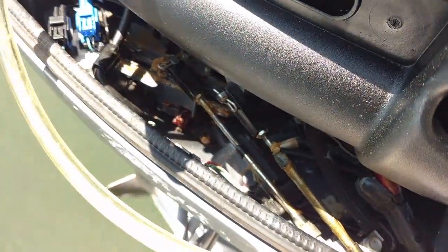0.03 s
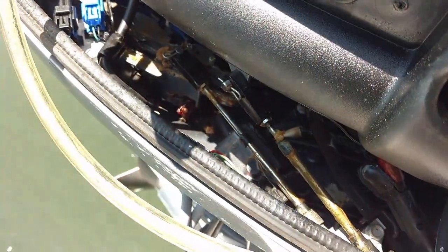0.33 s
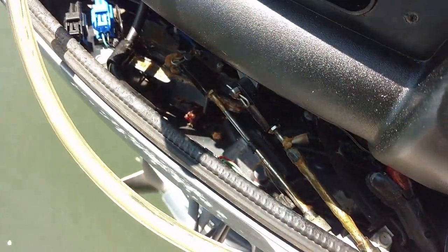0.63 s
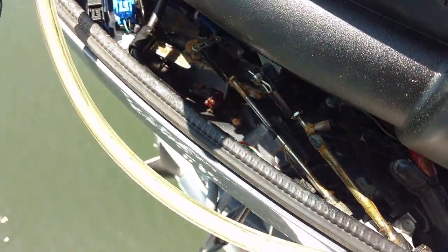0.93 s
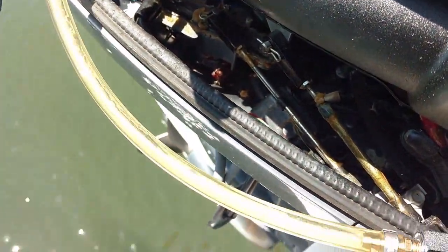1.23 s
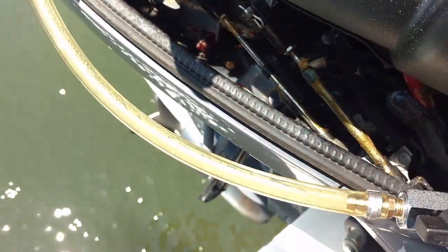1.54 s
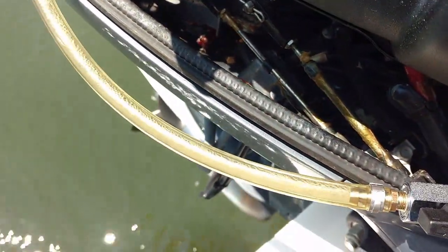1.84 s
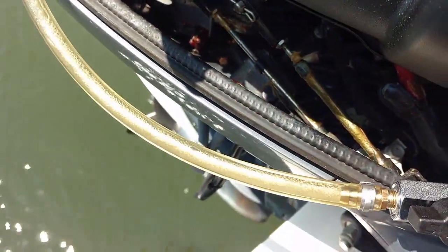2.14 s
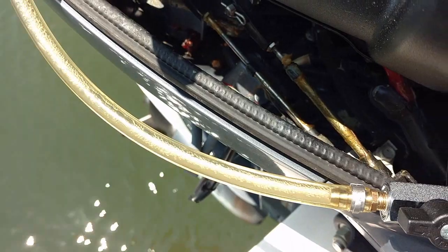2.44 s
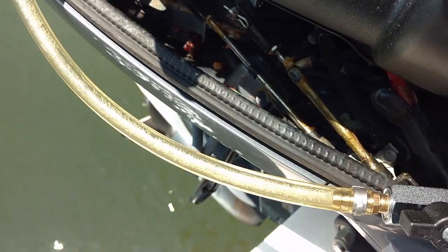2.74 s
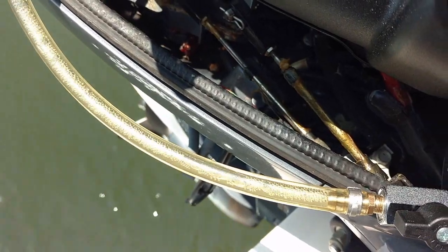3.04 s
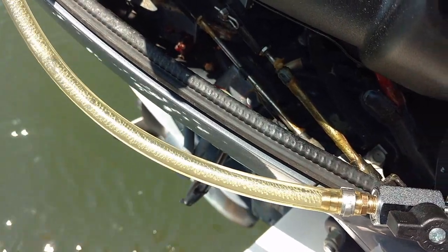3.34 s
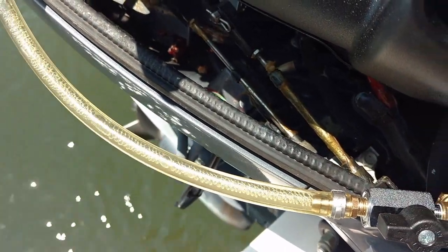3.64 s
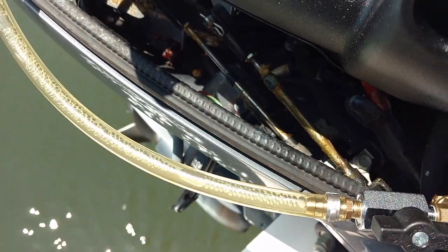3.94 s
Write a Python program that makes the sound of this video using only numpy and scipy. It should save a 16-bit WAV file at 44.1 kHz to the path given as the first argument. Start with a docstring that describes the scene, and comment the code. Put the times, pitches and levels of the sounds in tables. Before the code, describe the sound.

An electric fuel pump whines steadily on a nearby outboard engine for all four seconds, swelling slightly at times. A low motor drone beneath it drops away at about 2.5 seconds, just after a sharp click; fainter clicks are scattered from 1 second on. Water laps and plops at the hull throughout, with drips around 0.4 seconds. Wind rumbles on the microphone, bumping hardest near 1.1 seconds.

```python
"""A clean, steady whine comes first: an electric fuel pump on the open outboard engine of a moored boat,
heard from beside it on a hand-held phone with two microphone ports. Under it a low motor drone runs and
drops away. Water laps, plops and drips at the hull, ringing as bubbles, and something clicks sharply on
the engine. Faint harbour air lies behind, and wind bumps the microphone."""
import sys
import numpy as np
from scipy import signal
from scipy.fft import rfft, irfft
from scipy.io import wavfile
from scipy.ndimage import uniform_filter1d

SR = 44100
rng = np.random.default_rng(int(sys.argv[2]) if len(sys.argv) > 2 else 0)


def dump(signal):
    """Clip the signal to [-1, 1] and save it as 16-bit WAV at the path in sys.argv[1]."""
    limited = np.clip(np.atleast_2d(signal).T, -1, 1)
    pcm = np.round(limited * 32767).astype(np.int16)
    wavfile.write(sys.argv[1], SR, pcm)


N = 176400
T = np.arange(N) / SR
FREQS = np.arange(N // 2 + 1) * SR / N
PORT_LAG_S, PIVOT_HZ = .000385, 1215  # above the pivot the left port leads in phase
SIDE = np.array([[1], [-1]]) / 2  # splits a left-right difference between the ports


def undb(db):
    """Decibels to gain."""
    return 10 ** (np.asarray(db) / 20)


def unit(x):
    """Scale to rms 1."""
    return x / np.sqrt(np.mean(x ** 2))


def curve(rows, column=1):
    """One column of a table, joined by straight lines in time."""
    rows = np.array(rows)
    return np.interp(T, rows[:, 0], rows[:, column])


def spectrum(points):
    """Points joined by straight lines on a log-frequency axis."""
    points = np.array(points)
    return np.interp(np.log(FREQS + 1), np.log(points[:, 0]), points[:, 1])


def colour(x, points):
    """Filter a sound by a spectrum and scale it to rms 1."""
    return unit(irfft(rfft(x) * undb(spectrum(points)), N))


def noise():
    """White noise."""
    return rng.standard_normal(N)


def walk(rate_hz):
    """Smooth random wander up to about a given rate, at rms 1."""
    return unit(irfft(rfft(noise()) * np.exp(-(FREQS / rate_hz) ** 2), N))


def add(out, start, sound):
    """Mix a short sound in at a time in seconds."""
    i = int(np.clip(start * SR, 0, N - 1))
    out[i:i + len(sound)] += sound[:N - i]


# The whine at the phone (multiple of the pump pitch, level [dB], left-right [dB], share of swell [0-1])
WHINE_PARTIALS = [(1, -38, -4.5, 1), (2, -44, -2, 0.44), (3, -45.5, 2.5, 0.34), (4, -63.5, 9.5, 0.7),
                  (5, -54, 1, 0), (6, -67, -13, 0), (7, -56, -1, 0), (8, -62.5, -5.5, 0.35),
                  (9, -68.5, -1, 0.4), (12, -68, 2, 0.9), (13, -70.5, -2, 1)]
# Swell of the whine (time [s], gain [dB])
WHINE_SWELL = [(0, -4), (.15, 4.5), (.29, 4), (.38, -2.5), (1.25, -3), (1.52, 1), (1.68, 0), (1.8, 0),
               (1.91, 2.5), (2.06, 4.5), (2.16, -3), (2.27, 3.5), (2.41, 4.5), (2.52, -3), (3.17, -2.5),
               (3.31, 4.5), (3.4, -2.5), (3.49, 2.5), (3.67, -3.5), (3.77, 5.5), (3.93, 1.5), (4, -3)]
# Rise and fall of the seventh partial (time [s], gain [dB])
SEVENTH_GAIN = [(0, -11), (.5, 0.5), (1.5, -5.5), (2.3, -1.5), (2.55, 3), (3.18, 3), (3.27, -15),
                (3.66, 2.5), (3.7, -5)]
# Extra rise and fall of the two highest partials (time [s], gain [dB])
TOP_PAIR_GAIN = [(1.4, -2), (1.95, 1), (2.2, -6), (3.2, -4), (3.52, 0.5), (4, 3.5)]


def fuel_pump(pump_hz=500.08, sway_rad=0.19, wobble_depth=.075, wobble_hz=18):
    """The pump whines on the open engine; each partial wobbles on its own, and most swell together."""
    phase = 2 * np.pi * pump_hz * T + sway_rad * walk(3.5)
    out = np.zeros((2, N))
    for k, db, pan_db, share in WHINE_PARTIALS:
        extra_db = (k == 7) * curve(SEVENTH_GAIN) + (k > 10) * curve(TOP_PAIR_GAIN)
        gain = undb(share * curve(WHINE_SWELL) + extra_db)
        wobble = wobble_depth * np.sqrt(k / 2) * (walk(wobble_hz) + 1j * walk(wobble_hz))
        tone = (gain + wobble) * np.exp(1j * k * phase)
        lead_rad = 2 * np.pi * PORT_LAG_S * max(k * pump_hz - PIVOT_HZ, 0)
        at_ports = undb(db + SIDE * pan_db) * np.exp(1j * SIDE * lead_rad)
        out += np.sqrt(2) * np.imag(tone * at_ports)
    return out


# The motor note, dead centre (time [s], pitch [Hz], level [dB])
MOTOR_NOTE = [(0, 141.9, -46), (.6, 144.4, -46), (2, 148.8, -45.5), (2.42, 149.6, -47), (2.52, 148, -60),
              (4, 142.6, -57.5)]
# The thrum below it (time [s], level [dB])
THRUM_LEVEL = [(0, -53.5), (1.5, -46), (2.1, -50), (3, -51), (3.6, -56)]


def motor_drone(octave_db=-9, thrum_hz=123.5):
    """A low motor note with its octave runs and drops away, over a steadier thrum."""
    pitch_hz = curve(MOTOR_NOTE) * (1 + 0.0038 * walk(6.3))
    phase = 2 * np.pi * np.cumsum(pitch_hz) / SR
    motor_gain = undb(curve(MOTOR_NOTE, column=2) + 1.34 * walk(22))
    motor = motor_gain * (np.sin(phase) + undb(octave_db) * np.sin(2 * phase))
    thrum_gain = undb(curve(THRUM_LEVEL) + 2 * walk(2.04))
    thrum = thrum_gain * np.sin(2 * np.pi * thrum_hz * T + 1.17 * walk(1.8))
    return np.sqrt(2) * (motor + thrum)


def bubble(hz, decay_s, glide=0.025):
    """A bubble rings briefly, its pitch rising by the fraction `glide` in each decay time."""
    age = T[:int(5 * decay_s * SR) + 2]
    phase = 2 * np.pi * hz * age * (1 + glide * age / decay_s / 2)
    attack = 1 - np.exp(-2 * age * hz)
    return np.sin(phase) * np.exp(-age / decay_s) * attack


def bubbles(low_hz, high_hz, cycles, spread_db, count):
    """A random stream of bubbles; the spread makes a few louder than the rest."""
    out = np.zeros(N)
    for when, pitch, rarity in rng.random((count, 3)):
        hz = low_hz * (high_hz / low_hz) ** pitch
        gain = undb(-spread_db * np.log(max(rarity, np.exp(-4))))
        add(out, when * N / SR, gain * bubble(hz, cycles / hz))
    return unit(out)


# Lapping down at the waterline (time [s], boom gain [dB], gurgle gain [dB], spray gain [dB])
LAP_GAINS = [(0, 8, -1.5, -2.5), (.25, 11, 2, 3.5), (.65, 4, -1, 4), (.95, 0.5, -0.5, 1.5),
             (1.15, 9, -2.5, 4), (1.65, 8, -0.5, 4), (1.8, 1, -1.5, 3.5), (2, -6.5, -3.5, 1.5),
             (2.3, -7, -3, -1.5), (2.55, 7.5, 0, 2), (2.7, -7, -5.5, 0), (3.28, -1.5, -6, -1.5),
             (3.35, 0, -4, 4.5), (3.6, -5, -5, -3), (3.8, 1, -5.5, -0.5), (4, -0.5, -7.5, -2.5)]
# Colour of the boom under the hull (frequency [Hz], gain [dB])
BOOM_COLOUR = [(250, -4), (330, -15.5), (395, -15.5), (440, 1.5), (530, 3.5), (620, -9.5), (730, -24.5),
               (850, -39), (2000, -58)]
# Colour of the gurgle alongside (frequency [Hz], gain [dB])
GURGLE_COLOUR = [(600, 5.5), (800, -14), (1000, 6.5), (1150, 3.5), (1280, 4.5), (1390, 10), (1600, -6),
                 (1900, 2.5), (2400, -2), (4000, -39)]
# Colour of the spray and its hiss (frequency [Hz], gain [dB])
SPRAY_COLOUR = [(1600, -19), (2450, 2), (3100, 11), (4200, -3.5), (5100, -0.5), (6200, 0.5), (7500, -5),
                (9500, -6), (12000, -12.5), (15000, -22.5)]


def lapping(boom_db=-47, gurgle_db=-43.5, spray_db=-54):
    """Big bubbles boom under the hull, smaller ones gurgle, and spray crackles more as the water stirs."""
    stir = undb(curve(LAP_GAINS, column=3))
    boom = colour(bubbles(296, 871.5, cycles=8, spread_db=0, count=700) + 0.22 * noise(), BOOM_COLOUR)
    gurgle = colour(bubbles(697, 2670, cycles=7.5, spread_db=2.2, count=2500) + noise(), GURGLE_COLOUR)
    crackle = stir * bubbles(3870, 14070, cycles=22, spread_db=3.5, count=3600)
    spray = colour(crackle + 2.7 * noise(), SPRAY_COLOUR)
    return (boom * undb(boom_db + curve(LAP_GAINS) + 2 * walk(19))
            + gurgle * undb(gurgle_db + curve(LAP_GAINS, column=2) + 2 * walk(15))
            + spray * stir * undb(spray_db + walk(10)))


# Colour of the background around the mooring (frequency [Hz], gain [dB])
AIR_COLOUR = [(25, -37), (70, -9), (130, -1.5), (180, -3.5), (215, 0), (260, -12.5), (400, -17.5),
              (720, -7), (1200, -22), (2500, -20.5), (12000, -45)]


def harbour_air(level_db=-45):
    """A faint, steady, low rush lies behind the boat."""
    return undb(level_db) * colour(noise(), AIR_COLOUR)


# Steady breeze right on the microphone (time [s], level [dB])
BREEZE_LEVEL = [(0, -38), (.45, -36.5), (.85, -35), (2.1, -34.5), (3.4, -36.5), (3.65, -41)]
# Gusts bumping the microphone (time [s], level [dB])
GUSTS = [(.06, -36), (.71, -27), (.79, -32), (.875, -29), (1.08, -24), (1.87, -32), (2.28, -27),
         (2.49, -46), (3.19, -31)]
# Colour of the wind rumble (frequency [Hz], gain [dB])
RUMBLE_COLOUR = [(20, -32), (35, -23), (55, 10), (100, 17.5), (150, 12), (210, 3.5), (400, -11),
                 (3000, -83)]


def wind(bump_s=0.024):
    """A breeze rumbles on the phone and gusts bump it; the right channel carries it inverted and just later."""
    breeze = undb(curve(BREEZE_LEVEL) + 2 * walk(18))
    bumps = sum(undb(db) * np.exp(-((T - when) / bump_s) ** 2) for when, db in GUSTS)
    rumble = colour(noise(), RUMBLE_COLOUR) * (breeze + bumps)
    return np.array([rumble, -np.roll(rumble, int(PORT_LAG_S * SR))])


# Plops against the hull (time [s], length [s], pitch [Hz], level [dB])
HULL_PLOPS = [(.061, 0.0072, 530, -31), (.652, 0.019, 460, -31), (.735, 0.013, 532, -31.5),
              (1.372, 0.019, 980, -36), (1.44, 0.1, 480, -39.5), (1.508, .012, 487, -33),
              (1.636, 0.041, 462, -34), (1.83, 0.048, 1290, -41.5), (2.139, 0.03, 617, -40.5),
              (2.215, .025, 466, -31), (2.424, 0.025, 937, -34), (2.427, 0.035, 1270, -41),
              (2.58, .02, 425, -45), (2.751, 0.02, 1020, -31.5), (2.933, 0.032, 1058, -32.5),
              (3.721, .08, 710, -43)]


def plops(count=7, decay_s=0.0045, pitch_spread=0.12):
    """Each plop at the hull is a quick cluster of bubbles around one pitch."""
    out = np.zeros(N)
    for start, length, hz, db in HULL_PLOPS:
        cluster = np.zeros(N)
        for k, (late, detune) in enumerate(rng.random((count, 2))):
            ring = bubble(hz * (1 + pitch_spread * (detune - .5)), decay_s, glide=0.021)
            add(cluster, start + length * (k + late) / count, ring)
        out += cluster * undb(db) * np.sqrt(length * SR / np.sum(cluster ** 2))
    return out


# Drops landing beside the hull (time [s], pitch [Hz], first bubble's peak [dB])
DROPS = [(0.308, 6000, -47), (.335, 3040, -32.5), (.404, 5940, -34.5), (.434, 5990, -31.5),
         (1.083, 3050, -37.5), (1.376, 3150, -39), (1.608, 5950, -39.5), (1.685, 6070, -39),
         (1.79, 6400, -43.5), (2.223, 5790, -39)]


def drips(cycles=48, glide=.004, splash_db=9.5, splash_ref_hz=10700):
    """A drop splashes and leaves a bubble, then a smaller one; low ones ring longer and splash less."""
    rings, splash_force = np.zeros((2, N))
    for (start, hz, db), (late, detune) in zip(DROPS, rng.random((len(DROPS), 2))):
        decay_s = cycles / hz
        first = undb(db) * bubble(hz, decay_s, glide)
        second = .5 * undb(db) * bubble(hz * (1 + detune / 10), decay_s / 2)
        add(rings, start, first)
        add(rings, start + (late + .5) * decay_s, second)
        add(splash_force, start, np.abs(first) * (hz / splash_ref_hz) ** 2)
    hiss = colour(noise(), [(2000, -24), (5000, 5), (7000, 10.5), (10000, -1), (15000, -19)])
    return rings + undb(splash_db) * uniform_filter1d(splash_force, 128) * hiss


# Clicks on the engine (time [s], level [dB], length before the decay [s], brightness [0-1])
ENGINE_CLICKS = [(1.059, -42.5, 0.0022, 0.17), (1.604, -41, 0.0031, 0.4), (1.716, -38, 0.0071, 0.28),
                 (2.132, -48.5, .003, 0.8), (2.4235, -49, .002, 0), (2.4279, -29, 0.0026, 0),
                 (2.744, -44.5, 0.019, 0), (3.315, -39.5, 0.0015, 0.23), (3.773, -46, 0.0038, 0.4)]
# Colour of the scrape in each click (frequency [Hz], gain [dB])
SCRAPE_COLOUR = [(800, -14), (1400, 8), (2300, 9.5), (3000, 14), (3800, 7), (5000, 2.5), (7000, -0.5),
                 (9300, 2.5), (12000, -5.5), (15000, -24)]


def clicks(decay_s=0.0075, tick_hz=10700, ring_hz=3800, ring_s=0.0075, ring_db=-4.5):
    """Hard parts scrape for a few milliseconds and a metal part rings off; light touches tick brighter."""
    scrape_force, tick_force, rings = np.zeros((3, N))
    metal = np.sin(2 * np.pi * ring_hz * T) * np.exp(-T / ring_s)
    for start, db, length, bright in ENGINE_CLICKS:
        force = undb(db) * np.exp(-np.maximum(T[:SR // 10] - length, 0) / decay_s)
        add(scrape_force, start, (1 - bright) * force)
        add(tick_force, start, bright * force)
        add(rings, start, (1 - bright) * undb(db + ring_db) * metal)
    grit = colour(noise() * undb(walk(530)), SCRAPE_COLOUR)
    hiss = colour(noise(), [(2000, -20), (tick_hz, 0), (18000, -8)])
    return rings + scrape_force * grit + tick_force * hiss


# Balance between the phone's two ports (frequency [Hz], left-right [dB])
PORT_BALANCE = [(100, -5), (380, -1), (700, -4), (1290, 0), (4400, 1.5), (8100, 3), (15000, 0.5)]
# A short diffuse smear, different in each channel, strongest in the treble (frequency [Hz], gain [dB])
DIFFUSE_SPREAD = [(800, -11), (2500, -16), (5000, -7)]


def microphone_ports(x, smear_decay_s=0.006):
    """Two ports hear one sound with a lag and a tilt; a short diffuse smear widens it."""
    lead_rad = 2 * np.pi * PORT_LAG_S * np.maximum(FREQS - PIVOT_HZ, 0)
    direct = undb(SIDE * spectrum(PORT_BALANCE)) * np.exp(1j * SIDE * lead_rad)
    smear = rng.standard_normal((2, N)) * np.exp(-T / smear_decay_s)
    smear /= np.sqrt(np.sum(smear ** 2, axis=1, keepdims=True))
    diffuse = undb(spectrum(DIFFUSE_SPREAD)) * rfft(smear)
    return irfft(rfft(x) * (direct + diffuse), N)


def scene():
    """From beside the engine: pump and drone, water, clicks and harbour air, with wind on the phone."""
    air = harbour_air()
    engine = fuel_pump() + motor_drone()
    around_boat = lapping() + plops() + drips() + clicks() + air
    return engine + microphone_ports(around_boat) + wind()


def record(dry):
    """The phone cuts the treble steeply above 15.2 kHz."""
    return signal.sosfilt(signal.ellip(8, .2, 70, 15200, fs=SR, output="sos"), dry)


dry = scene()
out = record(dry)
dump(out)
```